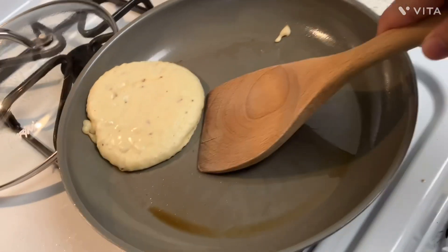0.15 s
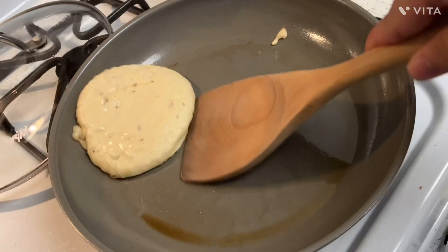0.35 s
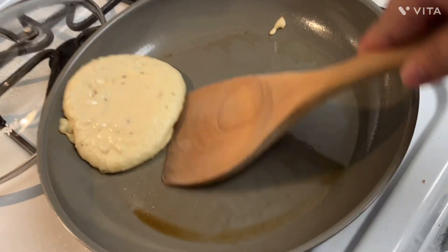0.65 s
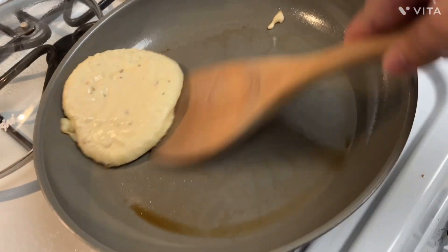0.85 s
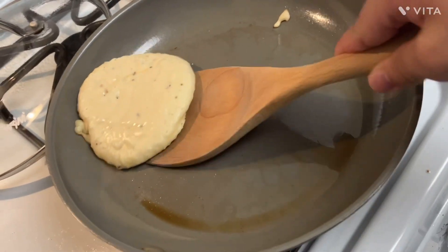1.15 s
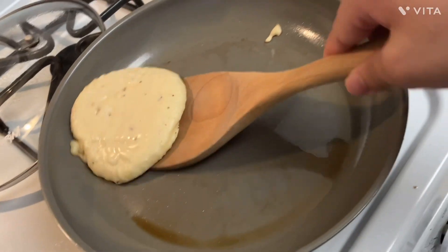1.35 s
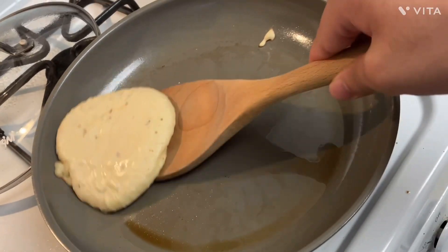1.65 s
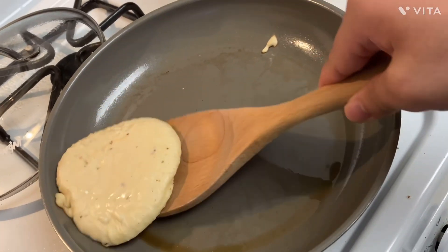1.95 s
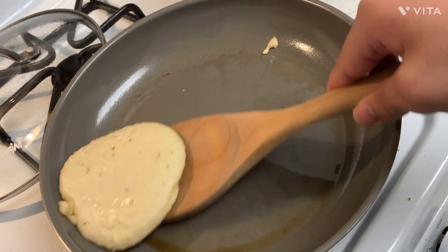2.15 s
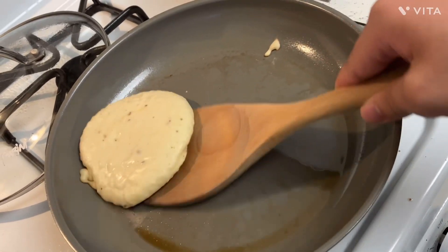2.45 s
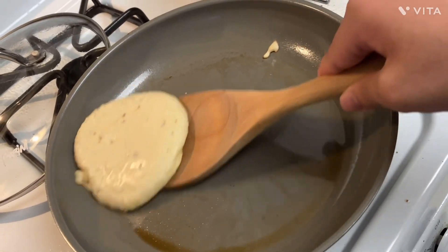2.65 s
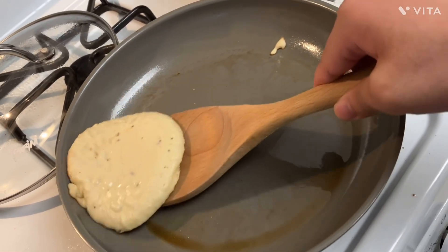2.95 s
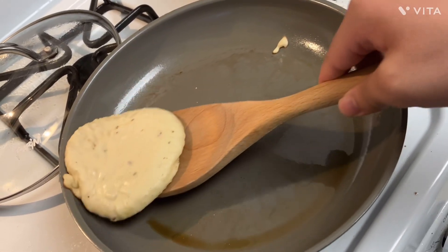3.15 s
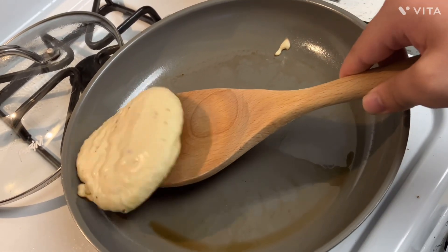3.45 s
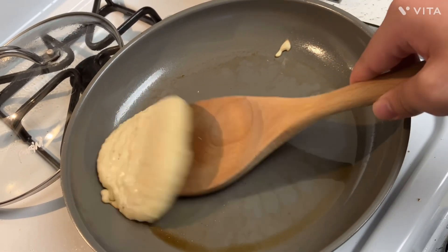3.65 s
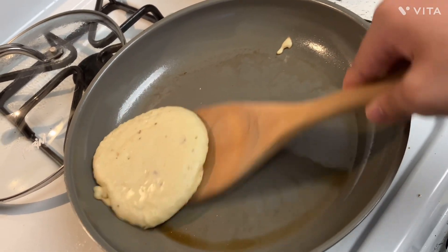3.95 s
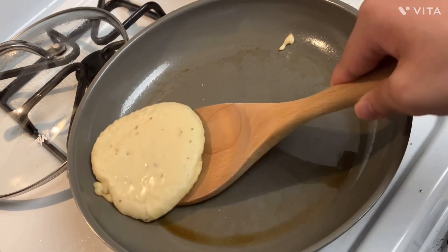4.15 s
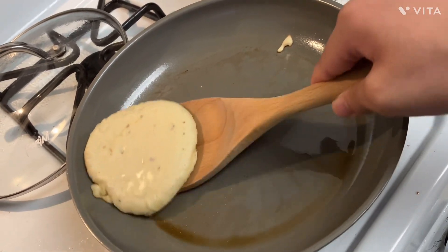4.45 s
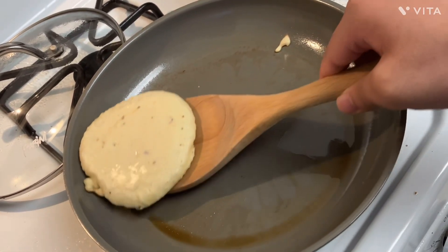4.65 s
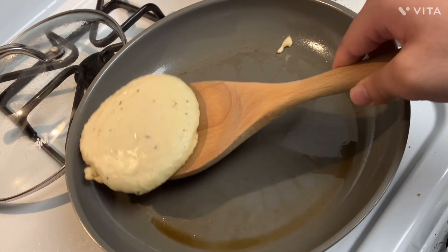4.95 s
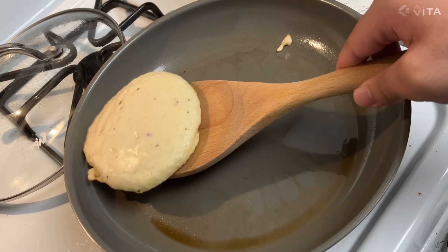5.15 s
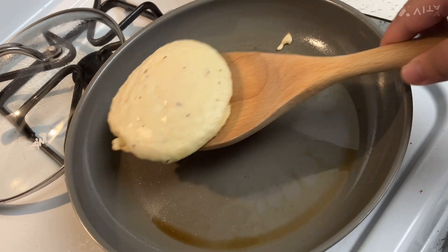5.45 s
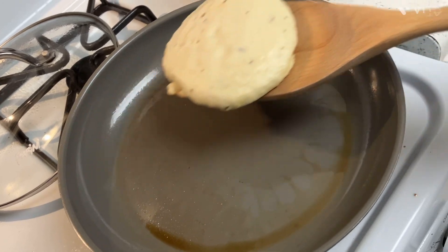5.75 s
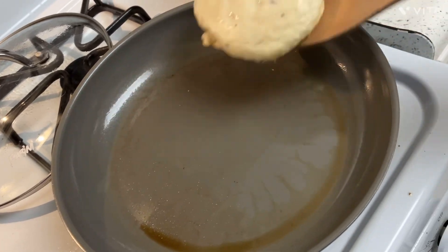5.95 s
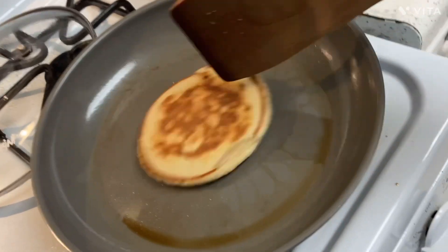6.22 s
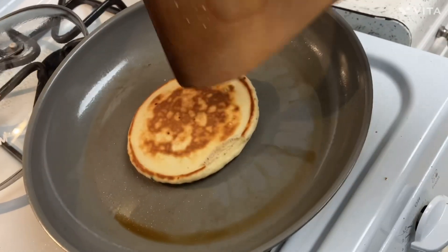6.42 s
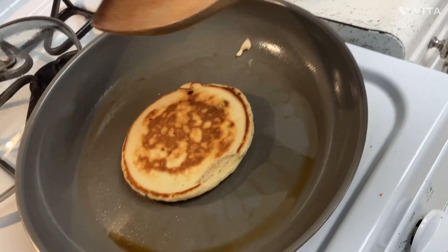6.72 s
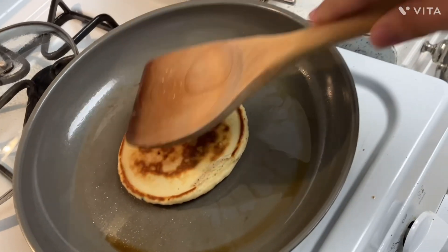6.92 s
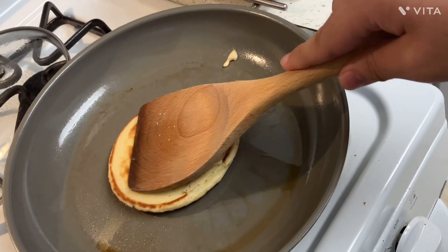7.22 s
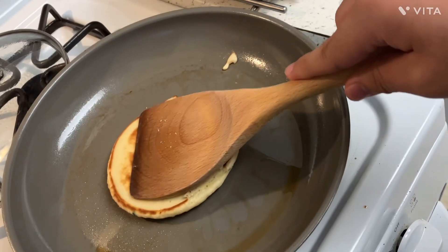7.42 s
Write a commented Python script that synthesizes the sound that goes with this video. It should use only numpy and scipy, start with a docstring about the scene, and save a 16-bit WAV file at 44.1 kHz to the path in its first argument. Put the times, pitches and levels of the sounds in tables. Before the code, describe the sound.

Short gritty wood-on-coating strokes come in uneven flurries over soft burner rumble and faint mains hum. Sharp wooden clacks ring the pan briefly and rock the grate. A near-silent gap holds only a faint peeling rustle, then batter slides and smacks flat with a low thud. Bubbling sizzle and crackling droplets follow, with a soft tap near the end. Close microphones, small hard room.

```python
"""First heard: quick back-and-forth strokes of a wooden spatula under a pancake, over burner and mains hum.
Close stereo microphones in a small kitchen, nonstick pan on a gas ring: shaped grains make the friction,
and struck modes make the blade's knocks and the pan rocking on its grate. The pancake peels off, is flipped,
slaps down as a burst of dense grains, then sizzles and spits as steam bubbles and droplets burst."""
import sys
import numpy as np
from scipy import signal
from scipy.fft import rfft, irfft
from scipy.io import wavfile
from scipy.ndimage import uniform_filter1d

SR = 44100
rng = np.random.default_rng(int(sys.argv[2]) if len(sys.argv) > 2 else 0)


def int16_out(signal):
    """Quantize to a 16-bit WAV file."""
    q = np.round(np.clip(np.atleast_2d(signal).T, -1, 1) * 32767)
    wavfile.write(sys.argv[1], SR, q.astype(np.int16))


N = 334278
TIME = np.arange(N) / SR   # s
LANDING_S, KITCHEN_T60_S, CUTOFF_HZ = 6.208, 0.23, 15900
DRAG_TREBLE_DB = -0.5   # the slow drag is duller than a stroke
RATTLE_FOLLOWS = 0.77   # dB of rattle per dB of blow
ROCKING_FOLLOWS = 0.27   # dB of shudder per dB of rubbing
ROCKING_LAG_S = 0.027   # the pan lags the push

# burner spectrum: [f/Hz, relative density/dB]
BURNER = [(22, -15.5), (40, -2.5), (65, 2.5), (95, -8.5), (150, -13), (215, -8.5), (280, -18), (380, -10.5),
          (550, -21.5), (850, -24), (1900, -39), (2750, -26.5), (3200, -40), (16000, -61.5)]
# likeness of the kitchen's background at the two microphones: [f/Hz, correlation]
LIKENESS = [(60, 1), (130, 0.67), (290, 0.67), (640, 0), (1400, 0), (16000, 0.048)]
# mains hum and stove-top drone: [f/Hz, mean rms level/dB]
HUM = [(59.4, -59.5), (215.3, -69), (376.8, -73.5)]
# strokes of the blade over the coating: [t/s, time above half power/s, relative level/dB,
# extra body/dB, extra treble/dB]
STROKES = [(.008, 0.018, -54, 4, 2.5), (0.087, 0.039, -54, 2.5, 1.5), (.25, 0.05, -67, 12, 5),
           (.35, 0.02, -55, 2, 1.5), (0.428, 0.029, -47, 0, 0), (0.526, 0.034, -49.5, -0.5, -1),
           (0.609, 0.04, -55, 7, 2.5), (0.688, 0.039, -49, 1.5, 1), (0.774, 0.03, -43, -0.5, 3),
           (0.853, 0.025, -44, 1.5, 7.5), (.935, 0.031, -40, -0.5, 3), (1.021, 0.03, -42, 0.5, 1.5),
           (1.125, 0.041, -56.5, -4, 2.5), (1.2, 0.035, -49, 1.5, 2), (1.384, 0.029, -43.5, 0, 3),
           (1.482, 0.027, -44, -1.5, 2), (1.548, 0.028, -40.5, 0.5, 1.5), (1.634, 0.035, -43.5, -2, -1),
           (1.746, 0.042, -57.5, -2, 0), (1.859, 0.028, -51.5, 0.5, 0.5), (2.152, 0.02, -55, 3, 3),
           (2.217, 0.036, -41.5, 1, 2.5), (2.302, 0.023, -44.5, 2.5, 4.5), (2.357, 0.026, -48, 10, 5),
           (2.475, 0.033, -40.5, 0, -2), (2.625, 0.039, -49, -1, -1), (2.665, 0.017, -53.5, 12.5, 1),
           (2.712, 0.021, -50.5, -7, 1), (2.801, 0.03, -49, 2, 1.5), (2.957, 0.053, -64, 8, 4.5),
           (3.901, 0.021, -40.5, 3.5, -3.5), (3.977, 0.039, -42.5, 2, -1),
           (4.054, 0.037, -38.5, -1.5, -1.5), (4.125, 0.031, -58.5, 7.5, 7),
           (4.206, 0.022, -43.5, -2, -2.5), (4.27, 0.033, -45, -4, -0.5), (4.333, 0.03, -46.5, 6, 3.5),
           (4.427, 0.035, -49, -1, 0.5), (4.5, 0.037, -53.5, 8.5, 2)]
# light drag of the blade between strokes, until it lifts off: [t/s, relative level/dB]
DRAG = [(0.05, -62), (0.19, -84), (0.3, -61.5), (0.9, -72.5), (1.28, -62.5), (1.7, -67.5), (2.04, -70.5),
        (2.25, -71), (2.7, -54), (2.9, -67.5), (3.15, -82.5), (3.66, -66.5), (3.74, -56), (3.82, -53),
        (4.16, -63.5), (4.52, -64), (4.64, -76)]
# friction spectrum: [f/Hz, relative density/dB]
RUB = [(150, 0), (400, -5.5), (560, 3.5), (730, 4), (1000, -4), (1450, 3), (1750, -0.5), (2050, 0),
       (2450, -1), (3200, 6), (4200, 3), (5000, 2), (6500, -2.5), (8200, 0.5), (10000, 1), (12500, -1.5),
       (15500, -5.5)]
# the blade knocks on the pan, levels relative: [t/s, blow level/dB, extra ring of the metal/dB,
# treble slope/dB per octave, pitch the struck spot favours f/Hz, its ring level/dB, blade note f/Hz,
# grate thud level/dB, thud pitch f/Hz, thud delay/s]
KNOCKS = [(0.1328, -53.5, -4, -23, 780, -72, 710, -54.5, 210, 0.0032),
          (0.38, -57, 4, -26, 750, -66, 700, -56.5, 158, 0.0036),
          (0.4567, -51.5, 10, -21, 557, -54, 570, -48.5, 151, 0.0045),
          (0.865, -40.5, 9, 3.5, 1530, -30.5, 665, -37.5, 136, 0.0062),
          (2.3256, -40.5, 16, -3, 1200, -32, 585, -46, 189, 0.016),
          (2.4935, -45, 11.5, 1, 1320, -40.5, 770, -42.5, 203, 0.017),
          (2.733, -41.5, 6, 0, 1240, -35, 680, -41, 165.4, .014),
          (3.047, -51.5, 7.5, -27, 1220, -57, 792, -51, 138, 0.0093),
          (3.6864, -36, 6, 7, 2400, -36, 910, -64, 135, 0.0025),
          (3.6878, -19.5, 7.5, -0.5, 1930, -23.5, 842, -33, 140, 0.0017),
          (3.8618, -34.5, 9, -3.5, 1970, -34.5, 560, -39.5, 157, 0.0078),
          (4.005, -35, 8, -2.5, 795, -38.5, 788, -42.5, 168, 0.0093),
          (4.285, -42.5, 9, -5, 2970, -38, 770, -44.5, 202, 0.0072),
          (4.297, -31, 2, -0.5, 1345, -31, 750, -33.5, 166, 0.00894),
          (4.4604, -34.5, 5, -3.5, 2260, -31.5, 556, -41, 155, .018),
          (4.71, -63.5, 0.5, -12, 1194, -64, 950, -61, 203.5, 0.0043),
          (5.0292, -66, 0, -17.5, 1408, -75, 744, -57.5, 207.3, 0.0032),
          (5.045, -65, 1, -15, 1200, -74, 600, -62, 240, 0.0037),
          (5.068, -66, 3.5, -19, 1200, -71, 800, -68, 200, 0.0047),
          (5.0818, -63, 8, -18, 1614, -72, 757, -66, 199, 0.0034),
          (5.108, -63, 3, -24, 1300, -69, 595, -70, 200, 0.0044),
          (6.1343, -51.5, -3, -14, 806, -55, 645, -60, 181, 0.0035),
          (6.146, -56.5, 3, -7, 1200, -50, 733, -61, 180, 0.0045),
          (7.156, -54, 3, -17, 1200, -64, 635, -57, 200, .004)]
# the pan ringing freely: [f/Hz, relative level/dB, t60/s]
PAN_MODES = [(471, -8.5, 0.1), (538, -4.5, 0.2), (582, -8, 0.2), (667, -8.5, 0.14), (773, -5, 0.07),
             (843, -3, 0.1), (1184, 5.5, 0.23), (1273, -4.5, 0.48), (1382, 1, 0.08), (1578, -7, .07),
             (1630, -3, 0.08), (1931, 3.5, 0.18), (2083, 0, 0.041), (2265, 0.5, 0.059), (2371, 4, .13),
             (2487, -0.5, 0.15), (3023, -0.5, 0.086), (3330, -2, 0.098), (3660, -3, 0.13),
             (3810, -6.5, .05), (4200, -4.5, 0.12), (4600, -10, 0.1), (5740, -12.5, 0.07),
             (6400, -9.5, 0.06), (6800, -12, .05), (7360, -10, 0.055), (7980, -4.5, 0.029),
             (9600, -11.5, .04), (10460, -11.5, 0.05)]
# grate and stove top under the pan: [f/Hz, relative level/dB, t60/s]
STOVE_MODES = [(67.45, -5, 0.17), (115.7, -8.5, 0.19), (128.5, -2.5, 0.29), (156.4, -2, 0.1),
               (189, 0, 0.13), (215, 0, 0.1), (251, -2, 0.08), (301.2, 0, 0.055), (345, -3.5, 0.096),
               (412, -6, 0.045)]
# spectrum of the blow's spray of weak modes: [f/Hz, relative density/dB]
CRACK = [(200, -18.5), (420, -5.5), (560, 1.5), (820, 3.5), (1000, -7.5), (1300, -3), (1800, 0.5),
         (2300, -2), (3200, -3.5), (4400, -5.5), (5700, -3), (7500, -5), (11500, -10), (16000, -25)]
# edges of the hollow, ring, clack, bite and tick registers: [f/Hz]
REGISTERS = [440, 1000, 1800, 2800, 4800, 16000]
# edges of the thud and rattle registers: [f/Hz]
GRATE_REGISTERS = [50, 235, 440]
# the pancake peels off the pan as it is lifted: [t/s, level/dB]
PEELING = [(5.492, -95), (5.503, -65), (5.515, -68.5), (5.535, -74), (5.6, -87.5)]
# wet batter sliding off the blade: [t/s, relative level/dB]
SLIDING = [(6.07, -98.5), (6.1, -57.5), (6.125, -77), (6.145, -49.5), (6.165, -64), (6.19, -53),
           (6.21, -92)]
# spectrum of the batter's slide and slap: [f/Hz, relative density/dB]
SLAP = [(60, 7), (150, -4), (310, 12), (450, -8), (850, 2), (1300, 0), (2200, -10), (4000, -2.5),
        (7000, -5), (11000, -2), (16000, -7.5)]
# vigour of the frying once the wet side is down: [t/s, relative sizzle level/dB]
FRYING = [(6.219, -49.5), (6.29, -50), (6.36, -45.5), (6.74, -47.5), (6.79, -50.5), (6.98, -50),
          (7.04, -53.5), (7.28, -52), (7.34, -52.5), (7.41, -52.5), (7.46, -45.5), (7.58, -51.5)]
# spectrum of sizzle and spits: [f/Hz, relative density/dB]
SIZZLE = [(200, -7), (450, -7), (700, 3), (950, -6), (1250, -1), (1900, -7), (2400, -6.5), (4400, 0.5),
          (7200, 0.5), (8300, 4.5), (12000, 7.5), (16000, 5.5)]
# broad resonances of the steam pockets under the batter: [f/Hz, relative level/dB, t60/s]
POCKETS = [(352, -1, 0.041), (697, -5.5, 0.028), (886, -2.5, 0.027), (1214, 3.5, 0.024),
           (1450, -1.5, 0.024), (1910, 2.5, 0.008), (2940, -1.5, 0.022)]
# the loudest droplets bursting in the fat: [t/s, relative peak level/dB]
SPITS = [(6.531, -28), (6.5495, -22), (6.6765, -30), (6.7144, -34), (6.7335, -28), (6.759, -31),
         (6.881, -39), (6.9129, -29), (6.9245, -27), (6.9464, -32), (6.9875, -28.5), (7.1374, -34),
         (7.1793, -36), (7.316, -38), (7.3375, -28.5), (7.348, -31), (7.3714, -30.5), (7.396, -34),
         (7.4085, -30), (7.571, -34)]
# the pan as the microphone pair picks it up: [f/Hz, left minus right level/dB, left lead/rad]
PAIR = [(130, 2.5, 0), (380, 0, 0), (680, 6, 0), (1200, 5, .4), (2700, 4, 1.5), (3800, 1.5, .4),
        (4700, 0, 2.6), (5300, 0, 2.8), (6300, -.5, .6), (7200, -.5, 0), (9170, 0, -np.pi),
        (11400, 0, -2 * np.pi), (13700, 0, -3 * np.pi), (15700, 0, -4 * np.pi)]


def from_db(db):
    """Decibels to gain."""
    return 10 ** (np.asarray(db) / 20)


def rms_one(x):
    """Scale to unit power."""
    return x / np.sqrt(np.mean(x ** 2) + 1e-20)


def attack_one(x):
    """Scale a blow to unit power over its first 20 ms."""
    return x / np.sqrt(np.mean(x[:SR // 50] ** 2) + 1e-20)


def at_hz(points, hz):
    """Read a spectrum along a log-frequency axis."""
    f, value = np.transpose(points)
    return np.interp(np.log(hz + 1), np.log(f), value)


def bins(x):
    """Frequencies of a signal's spectrum."""
    return np.fft.rfftfreq(x.shape[-1], 1 / SR)


def coloured(x, spectrum):
    """Give a steady signal a spectrum; rms 1."""
    gain = from_db(at_hz(spectrum, bins(x)))
    return rms_one(irfft(rfft(x) * gain, x.shape[-1]))


def band(x, low_hz, high_hz, order=3):
    """Causal band-pass."""
    edges = [low_hz, min(high_hz, .45 * SR)]
    return signal.sosfilt(signal.butter(order, edges, "band", fs=SR, output="sos"), x)


def low_pass_centred(x, hz):
    """Low-pass without delay."""
    return signal.sosfiltfilt(signal.butter(2, hz, fs=SR, output="sos"), x)


def drift(rate):
    """Slow chance with spread 1, from `rate` random points per second."""
    knots = rng.standard_normal(int(N / SR * rate) + 2)
    return rms_one(np.interp(TIME * rate, np.arange(len(knots)), knots))


def grains(per_s, spread_db):
    """Random clicks of uneven size; rms 1."""
    sizes = from_db(spread_db * np.minimum(rng.exponential(1, N), 4.5))
    signs = rng.choice([-1, 1], N)
    return rms_one(sizes * signs * (rng.random(N) < per_s / SR))


def dying(t, t60):
    """Free decay of a vibration, 60 dB in t60 seconds."""
    return np.exp(-np.log(1000) * t / t60)


def resonate(x, modes):
    """Drive a body's modes, each a two-pole resonator, with a running force; rms 1."""
    out = 0
    for k, (hz, db, t60) in enumerate(modes):
        r = np.exp(-np.log(1000) / (t60 * SR))
        w = 2 * np.pi * hz / SR
        mode = signal.lfilter([0, np.sin(w)], [1, -2 * r * np.cos(w), r * r], x)
        out = out + (-1) ** k * from_db(db) * mode
    return rms_one(out)


def struck(modes, t, scatter_db):
    """One blow: each mode's strength and sign vary by chance, and it is detuned a little."""
    hz, db, t60 = np.transpose(modes)[:, :, None]
    strength = from_db(db + scatter_db * rng.standard_normal(db.shape)) * rng.choice([-1, 1], db.shape)
    loaded_hz = hz * (1 + .008 * rng.standard_normal(hz.shape))
    return np.sum(strength * np.sin(2 * np.pi * loaded_hz * t) * dying(t, t60), axis=0)


def favouring(modes, spot_hz, octaves):
    """The modes as one spot excites them: those far from its pitch fall away."""
    hz, db, t60 = np.transpose(modes)
    distance = np.log2(hz / spot_hz) / octaves
    return np.transpose([hz, db - 20 * np.log10(1 + distance ** 2), t60])


def burst(t, t60, smooth_hz=130):
    """A dying spray of countless weak modes, evened out in pitch and then given the crack's spectrum."""
    spectrum = rfft(rng.standard_normal(len(t)) * dying(t, t60))
    power = uniform_filter1d(np.abs(spectrum) ** 2, int(smooth_hz * len(t) / SR))
    even = irfft(spectrum / np.sqrt(power), len(t))
    spray = coloured(even, CRACK) * (t < 2 * t60)
    return rms_one(spray) * np.sqrt(np.mean(dying(t, t60) ** 2))


def add(track, s, sound):
    """Mix a sound in at a time."""
    at = int(s * SR)
    track[at:at + len(sound)] += sound[:N - at]


def background(burner_db=-56.5, waver_db=2.0):
    """The flame rumbles and faintly hisses, as partly correlated shaped noise, over a wavering hum."""
    mid, side = rfft(rng.standard_normal((2, N)))
    alike = np.clip(at_hz(LIKENESS, bins(TIME)), -1, 1)
    air = irfft(np.sqrt(1 + alike) * mid + np.sqrt(1 - alike) * side * [[1], [-1]], N)
    hum = 0
    for hz, db in HUM:
        level = np.sqrt(2) * from_db(db + waver_db * drift(4.1))
        hum = hum + level * np.sin(2 * np.pi * hz * TIME + 0.2 * drift(3.3))
    return from_db(burner_db + 0.18 * drift(19)) * coloured(air, BURNER) + hum


def sizzle(level_db=1.77, cooked_db=-74.0, flutter_db=1.6, surge_db=0.8, crackle_db=-3.5,
           boil_db=-54.5, boil_t60=4.6):
    """Countless steam bubbles burst under the batter; the cooked side barely whispers, the wet side hisses."""
    s, db = np.transpose(FRYING)
    wet = from_db(np.interp(TIME, s, db, left=-120) + level_db)
    cooked_gain = np.interp(TIME, [0, 2.6, 3.15, 3.55, 4.5, 4.8], [2.4, 2.7, 0.53, 1.5, 0.56, 0.41])
    cooked = from_db(cooked_db) * cooked_gain
    unsteady = from_db(flutter_db * drift(60) + surge_db * drift(17))
    bubbles = grains(per_s=17000, spread_db=2.0)
    crackle = from_db(crackle_db) * grains(per_s=380, spread_db=1.0)
    hiss = (wet + cooked) * unsteady * coloured(bubbles + crackle, SIZZLE)
    # the first violent boil bubbles under the pancake, and calms as the batter sets
    boil = resonate(grains(per_s=650, spread_db=3.5), POCKETS)
    calming = (TIME > LANDING_S) * dying(np.abs(TIME - LANDING_S), boil_t60)
    return hiss + from_db(boil_db) * boil * calming


def rubbing_power():
    """Power of the friction's body, middle and treble: a light drag, and a bell-shaped swell per stroke."""
    drag = from_db(np.interp(TIME, *np.transpose(DRAG), right=-120)) ** 2
    powers = np.array([drag, drag, drag * from_db(DRAG_TREBLE_DB) ** 2])
    for s, length, db, body, treble in STROKES:
        near = np.abs(TIME - s) < 2 * length
        swell = 2 ** -(2 * (TIME[near] - s) / length) ** 2
        powers[:, near] += from_db([[db + body], [db], [db + treble]]) ** 2 * swell
    return powers


def wandering(x, echo_s, swing, echo_gain, rate):
    """Sound bounces in the wedge between blade and pan: one echo whose lag drifts, so resonances slide."""
    lag = echo_s * np.exp(swing * drift(rate))
    return rms_one(x + echo_gain * np.interp(TIME - lag, TIME, x))


def scraping(body_power, power, treble_power, ring_db=-9.5, treble_db=-0.5, judder_db=2.0,
             grit_db=-7.5, damped_share=0.54):
    """Wood fibres slip over the coating: strokes swell with the blade's speed and ring the damped pan."""
    # fine slips, with a sparser layer of coarser grit
    slips = grains(per_s=7000, spread_db=1.0) * from_db(judder_db * drift(420))
    slips = slips + from_db(grit_db) * grains(per_s=640, spread_db=-1.0)
    slips = wandering(slips, echo_s=0.00065, swing=.35, echo_gain=.4, rate=22)
    damped_modes = np.multiply(PAN_MODES, [1, 1, damped_share])
    ringing = resonate(band(slips, 3100, 22000, order=1), damped_modes)
    # the colour wanders slowly to and fro as the blade rubs
    rub = coloured(slips, RUB) + from_db(ring_db) * ringing
    rub = wandering(rub, echo_s=0.0014, swing=.5, echo_gain=0.36, rate=7)
    body = low_pass_centred(rub, 2500)
    dull = low_pass_centred(rub, 6000)
    treble = from_db(treble_db) * (rub - dull)
    return body * np.sqrt(body_power) + (dull - body) * np.sqrt(power) + treble * np.sqrt(treble_power)


def rocking(power, level_db=-45.0):
    """The pan shudders on the grate, following the blade's push a moment late."""
    keep = np.exp(-1 / (ROCKING_LAG_S * SR))
    push = np.sqrt(signal.lfilter([1 - keep], [1, -keep], power))
    shudder = resonate(rng.standard_normal(N), STOVE_MODES)
    return from_db(level_db) * push ** ROCKING_FOLLOWS * shudder


def knocks(crack_db=17.5, crack_t60=0.017, held_db=8.5, held_t60=0.043, free_db=-10.5,
           tail_db=-12.5, tail_t60=0.14, contact_s=0.00048, softening=0.96, spot_db=-7.0,
           blade_db=-9.0, blade_t60=0.035, skid_db=-12.5, skid_t60=0.041):
    """The blade hits the pan: wood cracks, the held metal is damped, and what is left rings on."""
    out, t = np.zeros(N), np.arange(SR // 2) / SR
    # centres of clack, bite and tick, in octaves above the centre of the ring register
    centre_squares = np.multiply(REGISTERS[2:-1], REGISTERS[3:])
    octaves = np.log2(np.sqrt(centre_squares / (REGISTERS[1] * REGISTERS[2])))
    register_db = [-6.5, -13.0, -0.5, -2.0, -8.0]   # hollow, ring, clack, bite, tick
    damping = from_db(held_db) * dying(t, held_t60) + from_db(free_db)
    for s, hollow, extra_ring, slope, spot_hz, spot, blade_hz, *_ in KNOCKS:
        # the softer the contact, the faster the blow falls away above the ring register
        ring = hollow + extra_ring
        clack, bite, tick = hollow + slope * octaves
        # countless weak modes blur into a tail behind the strong ones
        pan = struck(PAN_MODES, t, scatter_db=1.5) * damping + from_db(tail_db) * burst(t, tail_t60)
        # a light touch is mostly the wood's own dull sound
        pan = pan * np.interp(ring, [-55, -30], [.25, 1])
        # a soft contact also lasts longer
        contact = 1 - np.exp(-t / (contact_s * from_db(-softening * slope)))
        blow = (pan + from_db(crack_db) * burst(t, crack_t60)) * contact
        levels = np.add([hollow, ring, clack, bite, tick], register_db)
        for db, low_hz, high_hz in zip(levels, REGISTERS, REGISTERS[1:]):
            add(out, s, from_db(db) * attack_one(band(blow, low_hz, high_hz)))
        # the blade flexes with a short hollow note, whose pitch depends on how it is held
        note = np.sin(2 * np.pi * blade_hz * t) * dying(t, blade_t60) * contact
        add(out, s, from_db(hollow + blade_db) * attack_one(note))
        # each spot on the pan brings out a few modes of its own
        tone = struck(favouring(PAN_MODES, spot_hz, octaves=0.14), t, scatter_db=0.0)
        tone = tone * np.sqrt(damping) * dying(t, t60=0.21) * contact
        add(out, s, from_db(spot + spot_db) * attack_one(tone))
        # the blade's edge skids for an instant before it seats: a reversed burst
        skid = burst(t, skid_t60)[t < .02][::-1]
        add(out, s - len(skid) / SR + contact_s, from_db(bite + skid_db) * skid)
    return out


def thud(t, hz, rise_s, shudder_db, shudder_t60, swing_t60=0.1):
    """The pan rocks: a few swings build up and die, the stove top answers, then an uneven shudder."""
    modes = favouring(STOVE_MODES, hz, octaves=1.2)
    rise = 1 - np.exp(-t / rise_s)
    swing = rms_one(np.sin(2 * np.pi * hz * t) * dying(t, swing_t60) * rise)
    shudder = resonate(rng.standard_normal(len(t)) * dying(t, shudder_t60), modes)
    blow = rms_one(struck(modes, t, scatter_db=2.0) * rise * dying(t, t60=0.3))
    # energy of 50 ms at rms 1
    return rms_one(blow + swing + from_db(shudder_db) * shudder) * np.sqrt(.05 * SR / len(t))


def grate_knocks(thud_db=0.5, rattle_db=-17.0):
    """A moment after each knock the grate answers: the stove top thuds and the bars rattle."""
    out, t = np.zeros(N), np.arange(SR // 2) / SR
    for s, blow, *_, low, hz, lag in KNOCKS:
        shake = thud(t, hz, rise_s=0.004, shudder_db=-5.0, shudder_t60=0.2)
        levels = [low + thud_db, RATTLE_FOLLOWS * blow + rattle_db]
        for db, low_hz, high_hz in zip(levels, GRATE_REGISTERS, GRATE_REGISTERS[1:]):
            part = rms_one(band(shake, low_hz, high_hz, order=2))
            add(out, s + lag, from_db(db) * np.std(shake) * part)
    return out


def peeling(low_hz=1400, high_hz=3100):
    """The tacky underside lets go of the coating with a faint rustle of band-passed grains."""
    level = from_db(np.interp(TIME, *np.transpose(PEELING), left=-140, right=-140))
    return level * rms_one(band(grains(per_s=2500, spread_db=1.5), low_hz, high_hz))


def landing(slap_db=-26.5, rise_s=0.0029, slap_t60=0.051, smack_db=-35.0, smack_t60=0.013,
            thud_db=-40.5, thud_lag_s=0.00777, ring_db=-40.0, puff_db=-39.5, puff_t60=0.42, slide_db=0.5):
    """Wet batter slides off the blade, meets the pan edge first, then smacks flat and shakes the grate."""
    since, t = TIME - LANDING_S, np.arange(SR // 2) / SR
    spread = np.exp(np.minimum(since, 0) / rise_s) * dying(np.maximum(since, 0), slap_t60)
    slide = from_db(slide_db + np.interp(TIME, *np.transpose(SLIDING), left=-140, right=-140))
    out = (from_db(slap_db) * spread + slide) * coloured(grains(per_s=9100, spread_db=2.0), SLAP)
    smack = band(burst(t, smack_t60), 500, 1630, order=1)
    add(out, LANDING_S, from_db(smack_db) * attack_one(smack))
    shake = thud(t, hz=155.5, rise_s=0.021, shudder_db=-3.0, shudder_t60=0.5)
    add(out, LANDING_S + thud_lag_s, from_db(thud_db) * shake)
    ring = band(struck(PAN_MODES, t, scatter_db=-1.0) * dying(t, t60=0.062), 810, 1170)
    add(out, LANDING_S, from_db(ring_db) * attack_one(ring))
    # air squeezed out from under the pancake
    puff = rms_one(band(rng.standard_normal(len(t)), 61, 95)) * dying(t, puff_t60)
    add(out, LANDING_S, from_db(puff_db) * puff)
    return out


def spitting(spit_db=8.5, sputter_db=-54.5, sputter_follows=0.63, clump_db=2.0):
    """Droplets burst in the fat with sharp ticks: a few loud ones over an uneven sputter."""
    s, db = np.transpose(FRYING)
    vigour = np.interp(TIME, s, db - db.mean())
    level = from_db(sputter_db + sputter_follows * vigour + clump_db * drift(42))
    ticks = level * grains(per_s=120, spread_db=1.2) * (TIME > LANDING_S)
    for s, peak in SPITS:
        add(ticks, s, from_db([peak + spit_db]))   # a single-sample click
    return np.std(ticks) * coloured(ticks, SIZZLE)


def microphone_pair(x):
    """Sound from the pan reaches the two ports with a difference of level and phase."""
    hz, balance, lead = np.transpose(PAIR)
    level = from_db(np.interp(bins(x), hz, balance) / 2)
    half = level * np.exp(.5j * np.interp(bins(x), hz, lead))
    return irfft(rfft(x) * np.array([half, 1 / half]), N)


def scattered(x, tail, low_hz, high_hz):
    """Convolve with a pair of band-passed noise tails, each of unit energy before the filter."""
    tail = tail / np.sqrt(np.sum(tail ** 2, axis=1, keepdims=True))
    return signal.fftconvolve(x[None], band(tail, low_hz, high_hz, order=1), axes=1)[:, :N]


def stove_top(x, bounce_db=-4.5, bounce_t60=0.07, top_hz=4500, lean_db=1.9):
    """The pan wall and the stove top throw back a quick scatter, unlike at the two ports."""
    t = np.arange(SR // 20) / SR
    scatter = rng.standard_normal((2, len(t))) * dying(t, bounce_t60)
    return from_db(bounce_db + np.array([[lean_db], [-lean_db]])) * scattered(x, scatter, 190, top_hz)


def kitchen(x, room_db=-7.5, wall_hz=6500, gap_s=0.0016):
    """Hard nearby surfaces return a short, duller tail, different on each side."""
    t = np.arange(SR // 2) / SR
    onset = np.clip(t / gap_s - 1, 0, 1)
    tail = rng.standard_normal((2, len(t))) * dying(t, KITCHEN_T60_S) * onset
    return from_db(room_db) * scattered(x, tail, 140, wall_hz)


def scene():
    """Everything in the pan, its echoes from stove and kitchen, and the burner."""
    body_power, power, treble_power = rubbing_power()
    pan = sizzle() + scraping(body_power, power, treble_power) + rocking(power)
    pan += knocks() + grate_knocks()
    pan += peeling() + landing() + spitting()
    return background() + microphone_pair(pan) + stove_top(pan) + kitchen(pan)


def record(dry):
    """The hardest peaks are rounded off below 0.9 and the top is cut steeply."""
    dry = dry / (1 + (dry / .9) ** 8) ** (1 / 8)
    return signal.sosfilt(signal.ellip(12, .2, 80, CUTOFF_HZ, fs=SR, output="sos"), dry)


dry = scene()
out = record(dry)
int16_out(out)
```